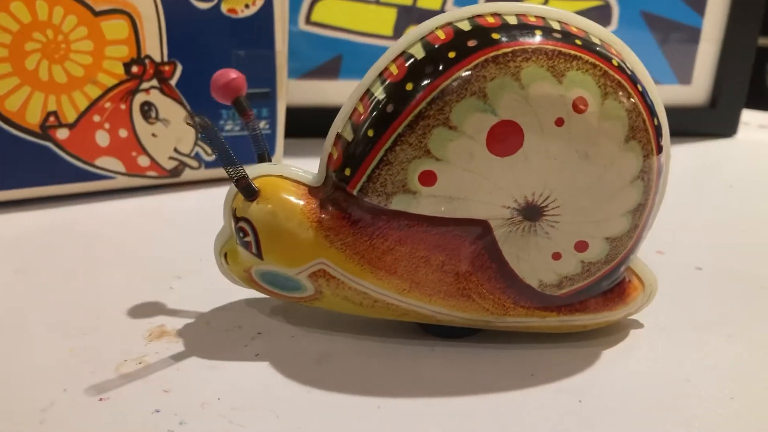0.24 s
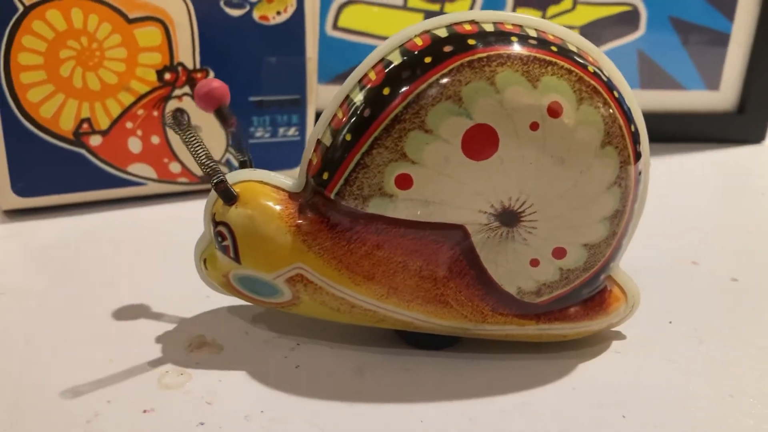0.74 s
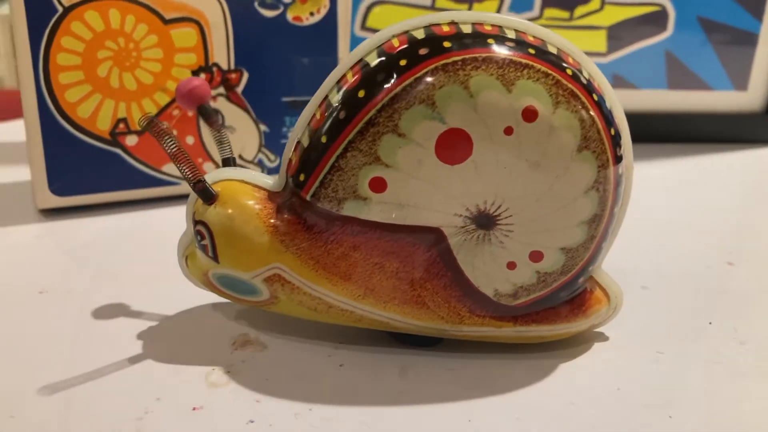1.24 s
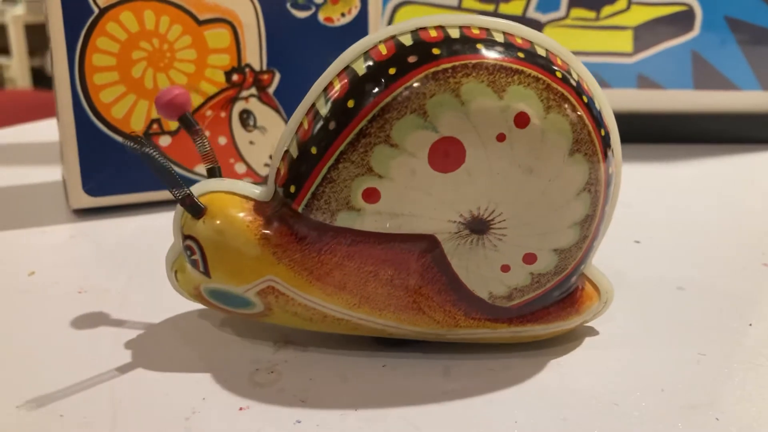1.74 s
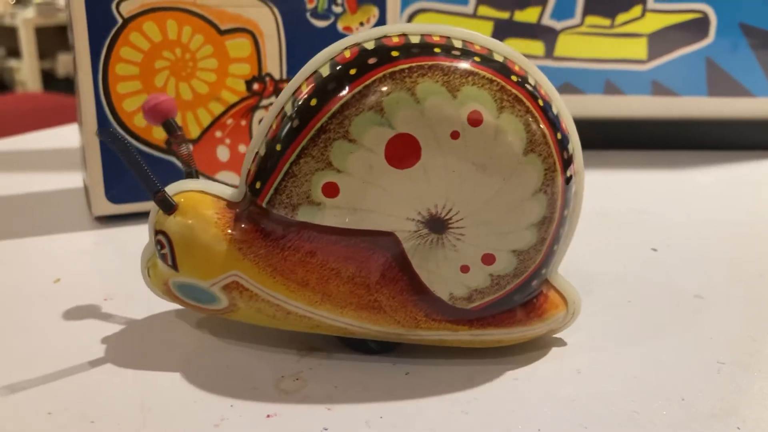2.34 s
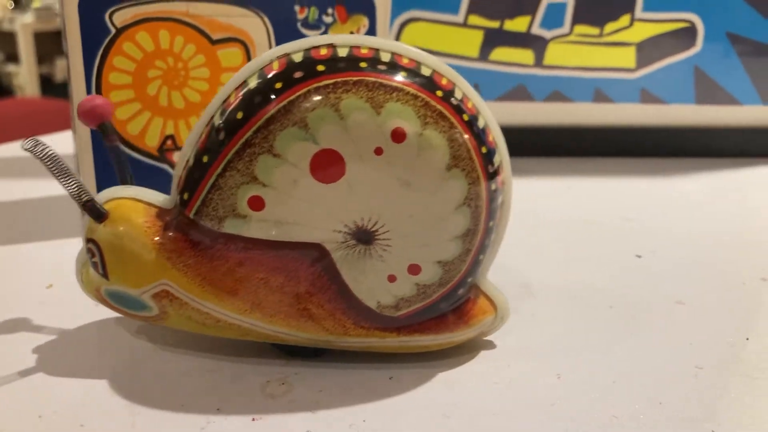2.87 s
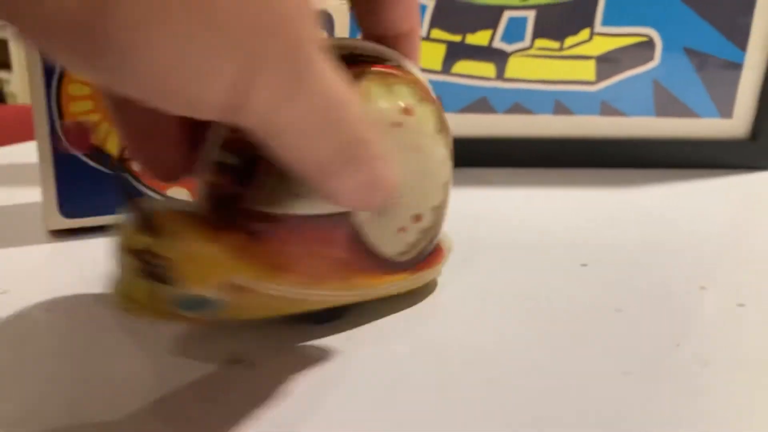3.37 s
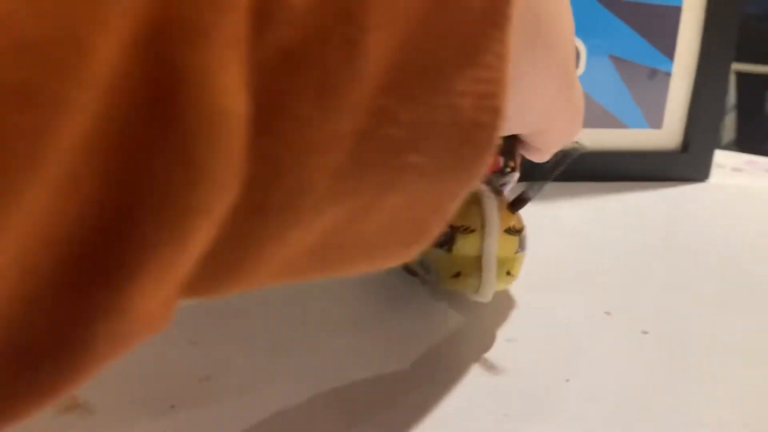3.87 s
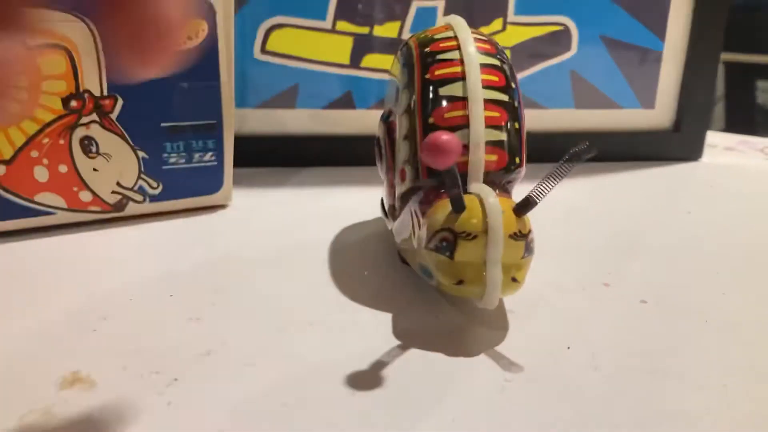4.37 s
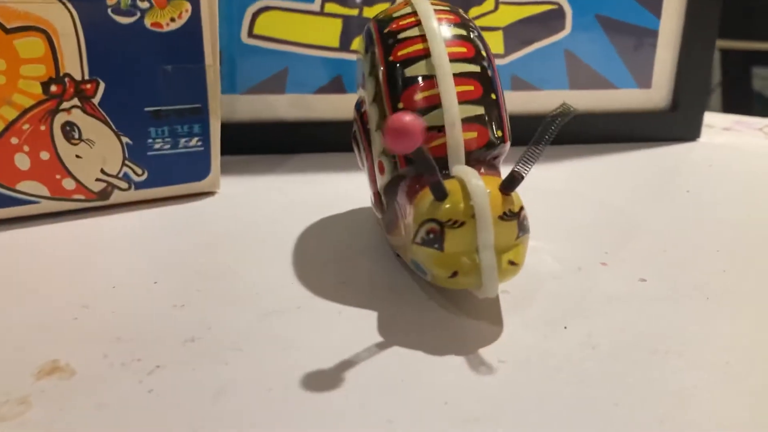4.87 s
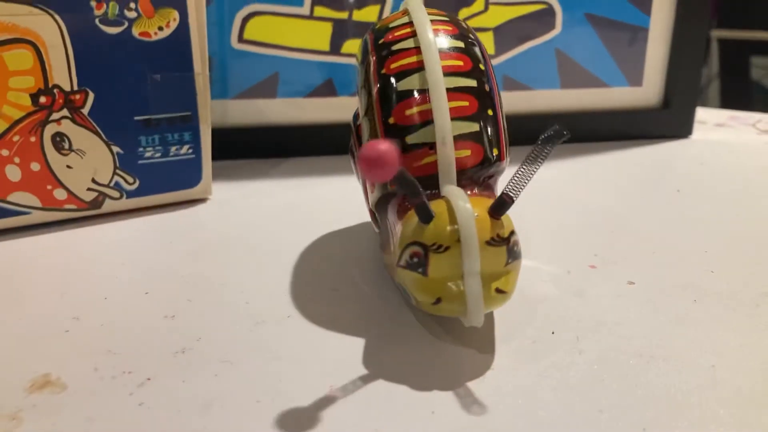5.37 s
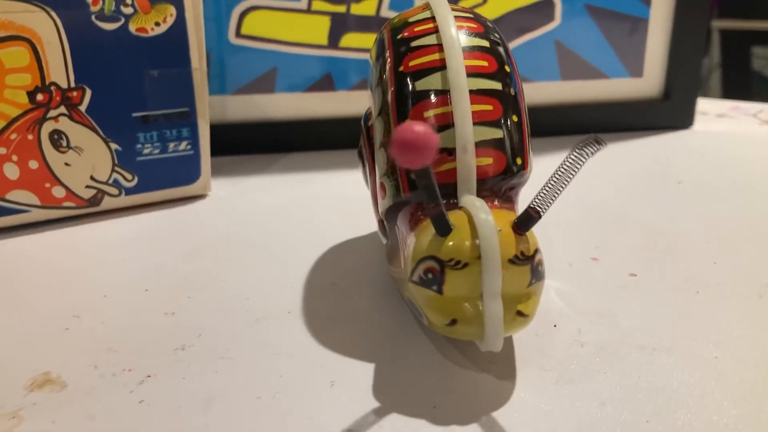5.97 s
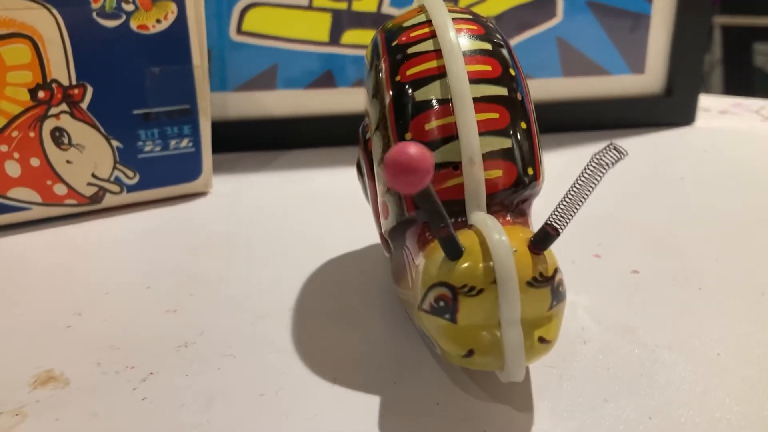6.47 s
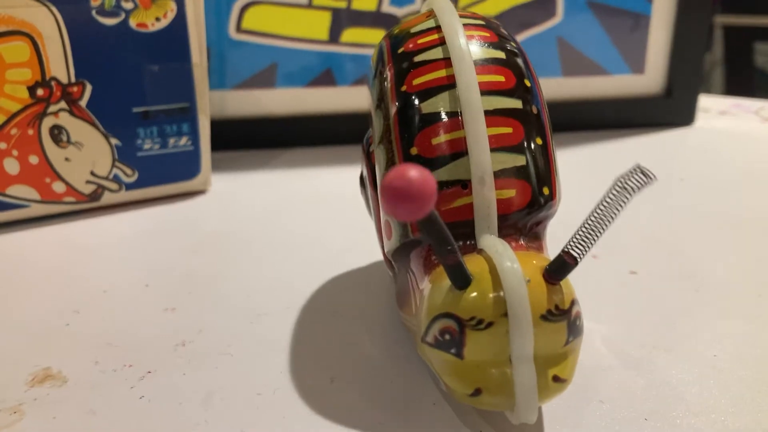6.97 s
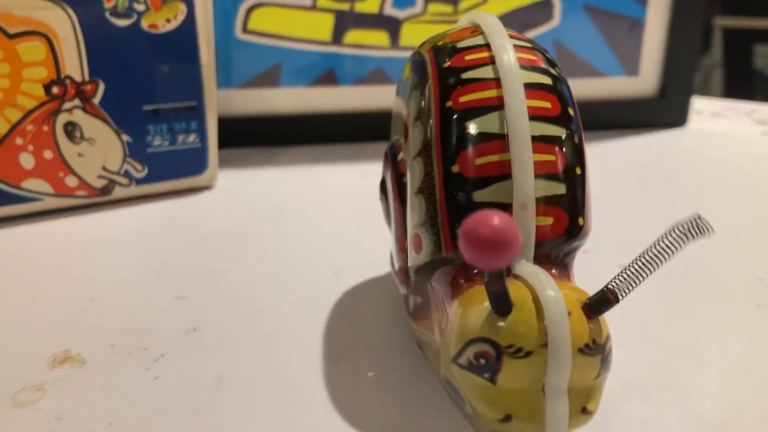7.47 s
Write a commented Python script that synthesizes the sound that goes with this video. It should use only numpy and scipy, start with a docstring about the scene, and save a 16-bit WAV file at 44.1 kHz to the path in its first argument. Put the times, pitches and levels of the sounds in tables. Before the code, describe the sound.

Close, dry stereo sound of a wind-up tin toy on a table in a quiet indoor room. From 0 s a dense, bright metallic rattle runs fast and strong, with hard bursts and hollow knocks over a buzzing governor whirr and low wheel rumble. Around 1.6 s it slows and drops, then swells unevenly from 2.1 s with a tiny hitch near 2.3 s. At 3.2 s a hand closes round the shell; the tone becomes more hollow, and about 3.5 s it booms against the table. After a brief surge near 4.1 s the chatter is weaker and slower until about 5.6 s. It then strengthens, with crowded hard bursts from 6.7 to 7.3 s. Near 7.4 s the mechanism stumbles into small rapid ticks and dies away by 7.7 s, leaving faint hum, soft rumble and hiss.

```python
"""Tin clockwork toy on a table

A wind-up tin toy creeps over a table close to a phone's two microphones, side-on, then turned by hand to face it.
Random tooth blows, throbbing with the spinning governor and a slower wheel, ring the resonances of shell and table:
a dense rattle with harder bursts and knocks. The spring's pull sags and recovers; at the end the train stutters.
The governor whirrs and the wheels rumble in the table. Mains hum, soft room rumble and faint hiss lie below."""
import sys
import numpy as np
from scipy import signal
from scipy.fft import rfft, irfft, next_fast_len
from scipy.io import wavfile
from scipy.ndimage import uniform_filter1d

SR = 44100
rng = np.random.default_rng(int(sys.argv[2]) if len(sys.argv) > 2 else 0)


def magnitude_from_level(level_db):
    """Linear magnitude for a level in decibels (20 dB per decade)."""
    exponent = np.asarray(level_db, float) / 20
    return 10 ** exponent


def pcm_store(signal):
    """Save signal as 16-bit PCM."""
    levels = np.round(np.clip(np.atleast_2d(signal), -1, 1) * 32767)
    wavfile.write(sys.argv[1], SR, levels.astype(np.int16).T)


N = 340452
TIME = np.arange(N) / SR
SIZE = next_fast_len(N + 8192)  # transform length, with space for the ringing
HZ = np.arange(SIZE // 2 + 1) * SR / SIZE


def toy():
    """Tooth blows ring the shell in its changing pose; whirr and table rumble follow the spring's pull."""
    level_db, turns = spring_run()
    pose = toy_pose()
    throb_db = throb(turns)
    steady = chatter(level_db, throb_db)
    hard = hard_bursts(level_db)
    blows = tooth_blows(steady, hard, throb_db, pose)
    under = whirr(turns, pose) + table_roll(throb_db)
    return shell(blows, pose) + magnitude_from_level(level_db) * under


# the spring's pull: t/s, governor turns per s, chatter level/dB before the shell
RUN = [(0, 114, -24.5), (0.351, 104, -26), (1.25, 92, -25.5), (1.62, 66, -33), (1.9, 73, -32),
       (2.131, 77, -26), (2.44, 76, -31.5), (2.6, 86, -26.5), (3.2, 92, -27), (3.6, 86, -32.5),
       (4.13, 115, -28), (4.25, 71, -33.5), (4.6, 61, -36), (5.07, 71, -30), (5.44, 70, -34.5),
       (5.53, 65, -33), (5.811, 88, -26), (6.099, 86, -29), (6.75, 80, -27), (7.27, 67, -28),
       (7.4, 110, -34.5), (7.429, 140, -29), (7.45, 63, -37), (7.571, 63, -42), (7.619, 62, -73),
       (7.72, 51, -53)]


def spring_run():
    """The pull of the spring sets the chatter level and drives the governor; its angle sums up its speed."""
    s, speed, level_db = np.transpose(RUN)
    turns = 2 * np.pi * np.cumsum(np.interp(TIME, s, speed)) / SR
    return np.interp(TIME, s, level_db), turns


def throb(turns):
    """Teeth load and unload with the governor, the eccentric wheel and chance (dB)."""
    wheel_ratio = 4.6  # governor turns for one turn of the wheel before it
    wheels = 1.53 * np.cos(turns) + 0.56 * np.cos(turns / wheel_ratio)
    return wheels + 0.99 * walk(70) + 1.2 * walk(200)


# the train hangs for an instant: t/s, level change/dB
HITCHES = [(2.321, -5), (5.405, -2.5), (6.659, -6), (7.434, -11)]
HITCH_S = 0.0093


def chatter(level_db, throb_db):
    """Strength of the steady tooth blows, throbbing and dropping where the train hangs."""
    hang_db = sum(bell(s, HITCH_S, db) for s, db in HITCHES)
    return magnitude_from_level(level_db + throb_db + hang_db)


# the hardest bursts of tooth blows: t/s, nominal peak level/dB before the shell
BURSTS = [(.016, -7), (.06, -2.5), (.114, -5), (.162, -2), (.275, -5), (.311, -12), (.406, -14), (.498, -7),
          (.546, -3), (.607, -10), (.756, -13), (.805, -4.5), (.893, -11), (.955, -10), (1.236, -10),
          (1.296, -8), (1.32, -3), (1.654, -20), (1.911, -12), (2.042, -9), (2.146, -12), (2.331, -7.5),
          (2.499, -6), (2.554, -9), (2.614, -16), (2.81, -6), (2.953, -6), (3.14, -3.5), (3.391, -17),
          (3.501, -9), (3.7, -11), (3.961, -11), (4.073, -5), (4.238, -14), (4.415, -11), (4.479, -8.5),
          (4.566, -11), (4.902, -13), (5.12, -9), (5.149, -10), (5.21, -9.5), (5.413, -9), (5.57, -13),
          (5.619, -18), (5.686, -14), (5.912, -9), (6.116, -7), (6.162, -7), (6.284, -9), (6.346, -4.5),
          (6.453, -8), (6.503, -15), (6.723, -6), (6.785, -5), (6.866, -6), (6.941, -2.5), (6.999, -5),
          (7.044, -8), (7.1, -6), (7.147, -5), (7.18, -4), (7.253, -6), (7.388, -7.5)]
# single teeth catching as the train stalls: t/s, nominal peak level/dB before the shell, length/s
TICKS = [(7.439, -20.5, 0.01), (7.459, -19, .012), (7.481, -21, .014), (7.503, -17, 0.0094),
         (7.522, -17.5, 0.0084), (7.551, -25, 0.012), (7.576, -17.5, 0.013), (7.603, -17, 0.016),
         (7.637, -17.5, 0.018), (7.667, -23, 0.014), (7.706, -19, 0.01)]


def hard_bursts(level_db):
    """Teeth crowd into listed bursts, lesser chance bursts and the single catches of the stall."""
    hard = bursts(BURSTS, rise_s=0.0076, length_s=0.014)
    hard = hard + bursts(lesser(level_db), rise_s=0.0048, length_s=0.0055)
    return hard + sum(bursts([(s, db)], 0.0026, length_s, square=4.7) for s, db, length_s in TICKS)


def lesser(level_db):
    """Chance bursts, one somewhere in each slot up to the stall, riding on the chatter level."""
    per_s, over_db = 42, 15.5  # nominal peak over the chatter
    slots = np.arange(0, TICKS[0][0] - .2, 1 / per_s)
    place = .5 + .5 * np.tanh(rng.standard_normal(len(slots)))
    s = np.clip(slots + place / per_s, 0, TIME[-1])
    return np.transpose([s, np.interp(s, TIME, level_db) + over_db])


def bursts(rows, rise_s, length_s, square=2):
    """Strength of (s, peak dB) bursts: quick rise, then a fall that is more abrupt the squarer it is."""
    crest_db = 13.5  # nominal peak over the rms
    s, db = np.transpose(rows)
    starts = np.bincount((s * SR).astype(int), magnitude_from_level(db - crest_db), N)
    age = TIME[:SR // 10]
    rise = 1 - np.exp(-(age / rise_s) ** 2)
    fall = np.exp(-(age / length_s) ** square)
    return signal.fftconvolve(starts, rise * fall)[:N]


# tooth blows that reach each group of modes, low to high: blows per s, exponential spread of level/dB
TEETH = [(9040, 1), (6000, 1.16), (6920, 0.4), (5910, 2.5), (8800, -0.8), (12070, 1.5), (11960, 0.46)]
# share of the blows that table, hollow and wall take: level/dB, one row for each pose
LOW_DB = [-11, -11, -10, -8.5, -11]
# the grip squeezes the shell onto the table and it booms: t/s, length/s, extra level of the lowest modes/dB
GRIP = (3.47, 0.15, 5.4)
# the closing hand cups the shell hollow: t/s, length/s, extra level/dB
CUP = (3.2, 0.064, 5)
# in the stall the catches hardly move the lowest modes but ring the hollow: level/dB of lowest, of hollow
STALL_DB = (-5.5, 5.5)
# hard knocks that ring the shell near 1 kHz: t/s, nominal peak level/dB of the ring
KNOCKS = [(0.0353, -28), (0.0907, -30), (0.1263, -18), (0.2059, -35), (0.23, -27), (0.26, -28),
          (0.2826, -27), (0.315, -23), (0.3443, -24), (0.368, -23), (0.4219, -28), (0.4614, -39),
          (0.5035, -31), (0.5528, -27), (0.6649, -32), (0.7672, -26), (0.8165, -23), (0.906, -31),
          (0.9584, -22), (1.0101, -23), (1.038, -29), (1.1458, -26), (1.2327, -24), (1.2979, -23),
          (1.3346, -27), (1.367, -22.5), (1.6518, -28), (1.72, -26.5), (2.0906, -27), (2.1216, -29),
          (2.3395, -30), (2.4977, -29), (2.5389, -40), (2.5684, -23), (2.6085, -30), (2.6993, -29),
          (2.7472, -30), (2.9038, -26), (2.9521, -28), (2.9716, -26), (3.0031, -32), (3.1433, -33),
          (3.1689, -27), (3.5244, -25), (3.8741, -34), (3.943, -37), (3.9684, -27), (4.0008, -32),
          (4.2657, -27), (4.4844, -24.5), (4.5421, -31), (4.9003, -28), (4.9921, -31), (5.1917, -41),
          (5.2121, -26), (5.3888, -35), (5.4205, -35), (5.4849, -35), (5.6542, -33), (5.7033, -33),
          (5.7254, -30), (5.7774, -26), (5.8351, -27), (5.916, -25), (6.0928, -25), (6.1227, -29),
          (6.2886, -24), (6.352, -27), (6.4792, -28), (6.5677, -41), (6.5947, -31), (6.6297, -24),
          (6.6902, -31), (6.8448, -25), (6.9361, -31), (6.9659, -30), (7.0015, -37), (7.1452, -40),
          (7.1901, -34), (7.2642, -24)]


def tooth_blows(steady, hard, throb_db, pose):
    """Each group of modes is struck by its own teeth, so it flickers on its own; knocks hit the shell wall."""
    low_db = np.interp(pose, range(len(LOW_DB)), LOW_DB)
    stalled = np.interp(TIME, [7.25, 7.45], [0, 1])
    table_db = low_db + bell(*GRIP) + STALL_DB[0] * stalled
    hollow_db = low_db + bell(*CUP) + STALL_DB[1] * stalled
    wall_db = low_db + 0.16 * throb_db
    group_db = [table_db, hollow_db, wall_db, 0, 0, 0, 0]
    # the wall answers bursts half a dB less than the others, in the stall half a dB more
    taken = [1, 1, magnitude_from_level(stalled - 0.5), 1, 1, 1, 1]
    pushes = []
    for db, part in zip(group_db, taken):
        flicker_db = 0.97 * walk(55) + 0.6 * walk(12)
        pushes.append(np.hypot(steady, part * hard) * magnitude_from_level(flicker_db + db))
    # one set is shared by the microphones, the other serves for what they do not share
    blows = np.array([[push * clicks(*teeth) for push, teeth in zip(pushes, TEETH)] for _ in range(2)])
    s, db = np.transpose(KNOCKS)
    knock_db = 15.5  # strength of the blow over the peak that it rings up to
    blows[:, 2] += np.bincount((s * SR).astype(int), magnitude_from_level(db + knock_db), N)
    return blows


def clicks(rate, spread_db):
    """Scattered one-sample blows of random size and sign, rms 1."""
    size = magnitude_from_level(spread_db * rng.exponential(size=N)) * rng.standard_normal(N)
    return unit(size * (rng.random(N) < rate / SR))


# the toy is turned by hand and comes near: t/s, pose 0-4 in the order of the level columns of SHELL
POSE = [(1.4, 0), (1.9, 1), (3.2, 1), (3.6, 2), (4.22, 2), (4.34, 3), (5.45, 3), (5.85, 4)]


def toy_pose():
    """The pose glides from side-on to facing and near."""
    return np.interp(TIME, *np.transpose(POSE))


# resonances of shell and table: f/Hz, width/Hz, then relative level/dB side-on, side-on further left,
# gripped, facing, facing and near
SHELL = [(390, 145, -9, -3, 0, -0.5, -0.5), (460, 29.8, 2, -2, 7, 8, 9), (657, 42, -1.5, -1, -3, -16, 0),
         (844, 114, -0.5, 1, -3.5, -17, 1.5), (1030, 70, 4, 6.5, 2, 3.5, 9.5),
         (1158, 89, 7, 4.5, 8.5, 8, 5.5), (1394, 51, -27, -2, 2.5, 2.5, -3),
         (1508, 98, 2.5, 1, 1.5, -5, -4.5), (2053, 270, -7, -8, -11, -10.5, -7),
         (2349, 103, -7.5, -5, 4.5, -7.5, 0), (2583, 190, -11, -38, -0.5, -9.5, 0),
         (2960, 175, 2.5, 3, -2, -3.5, -5), (3453, 120, 4.5, 1, -5, -1, -5),
         (3850, 380, 0, -2.5, -7.5, -4.5, -4.5), (4510, 294, -3, 1.5, -3, -3, -2.5),
         (4844, 160, 0.5, 3.5, 2.5, 2, 3), (5310, 170, 7, 2, 2, 0.5, 3.5),
         (5780, 630, -0.5, -0.5, -5.5, -2, -2.5), (6415, 310, 1.5, -16, 2, 0, 3.5),
         (7250, 190, 5, 4, 0.5, -2.5, -30), (7470, 1130, 3, 2.5, -4, -5, -1),
         (8220, 290, 0, -9.5, 6.5, 6.5, 6.5), (9100, 650, 4, 3.5, 1.5, 1.5, 1.5),
         (9760, 240, 5.5, 5, 2, 10, 9), (10100, 380, 6, 2.5, 5, 0.5, 4),
         (10950, 760, 3.5, 4.5, 0.5, 1.5, -0.5), (11430, 350, 2.5, -22.0, 3, 3, 2),
         (12400, 970, 2.5, 2, -0.5, 0, -0.5), (14050, 920, 0, -3.5, -6, -10, -4),
         (15140, 500, -4, -5, -7, -9.5, -6.5)]
# edges of the groups of modes, the lowest three being table, shell hollow and shell wall: f/Hz
PANELS_HZ = (0, 560, 950, 1800, 2800, 4200, 7800, 20000)


def shell(blows, pose):
    """The blows ring the modes: the pose fades between sets, a random drift between two drawn ripples of each."""
    modes = np.array(SHELL)
    panel = np.digitize(modes[:, 0], PANELS_HZ) - 1
    # the drift keeps the ripple from leaving steady lines
    drift = np.pi / 4 * (1 + np.tanh(1.4 * walk(5)))
    out = 0
    for view in range(modes.shape[1] - 2):
        for fade in (np.sin, np.cos):
            share = np.sqrt(np.clip(1 - abs(pose - view), 0, 1)) * fade(drift) ** 2
            bodies = np.array([ringing(modes[panel == k][:, [0, 1, 2 + view]]) for k in range(panel.max() + 1)])
            power = np.mean(abs(bodies) ** 2, axis=1)
            bodies[:3] /= np.sqrt(power[:3].sum())
            bodies[3:] /= np.sqrt(power[3:].sum())
            same, other = (rfft(share * blows, SIZE) * bodies).sum(axis=1)
            out = out + to_ports(same, other, turned=int(view >= 2))
    return out


def ringing(modes):
    """Causal response: the sum of steep (Hz, width, dB) resonances, with a random ripple in the treble."""
    count = 4096
    ripple_db, ripple_hz = 2, 70
    hz = np.arange(count + 1) * SR / (2 * count)
    centre, width, db = np.transpose(modes)
    detune = 1.29 * (hz[:, None] - centre) / width
    power = (magnitude_from_level(db) ** 2 / (1 + detune ** 2) ** 2).sum(axis=1)
    knots = rng.standard_normal(count + 1)
    ripple = np.interp(hz / ripple_hz, np.arange(count + 1), knots) * np.clip(hz / 4500, 0, 1) ** 2
    # folding the cepstrum gives minimum phase
    cepstrum = irfft(np.log(np.sqrt(power) * magnitude_from_level(ripple_db * ripple)))
    cepstrum[1:count] *= 2
    cepstrum[count + 1:] = 0
    return rfft(irfft(np.exp(rfft(cepstrum))), SIZE)


# left against right: f/Hz, left over right level/dB, right leads/half cycles side-on, when turned,
# likeness (0-1) side-on, when turned; above 6.5 kHz the lead is then flattened near whole half cycles
PORTS = [(60, -1.3, 0, 0, .98, .98), (300, .5, -.13, -.13, .95, .95), (1300, 2, -.22, -.22, .93, .88),
         (1800, 3, -1, -1, .7, .7), (2250, 7, -2, -1.1, .3, .3), (2550, 1, -3, -1.7, .6, .8),
         (3000, 1, -2.6, -2.3, .6, .7), (3350, 1, -2.9, -2.72, .6, .85), (3750, .8, -3.1, -3.02, .5, .93),
         (4100, .5, -3.8, -3.4, .45, .5), (5400, -3, -3.5, -3.5, .45, .7), (6500, 0, -3.9, -3.9, .3, .97),
         (7000, 0, -4, -4, .93, 1), (9080, 0, -3, -3, 1, 1), (11350, 0, -2, -2, 1, 1),
         (13550, 0, -1, -1, 1, 1), (15650, 0, 0, 0, 1, 1)]


def to_ports(same, other, turned):
    """Left and right channels from a shared spectrum, shifted in phase, and an unshared one."""
    hz, tilt_db, *rest = np.transpose(PORTS)
    lead = np.pi * np.interp(HZ, hz, rest[turned])
    # above 6.5 kHz the lead is flattened near whole half cycles
    lead -= (.46, .36)[turned] * np.sin(2 * lead) * (HZ > 6500)
    like = np.interp(HZ, hz, rest[2 + turned])
    tilt = magnitude_from_level(np.interp(HZ, hz, tilt_db) / 2)
    right = like * same * np.exp(1j * lead) + np.sqrt(1 - like ** 2) * other
    return irfft(np.array([same * tilt, right / tilt]), SIZE)[:, :N]


# governor imbalance: multiple of its turns, mean peak level/dB over the chatter in pose 0
WHIRR = [(1, -33), (2, -34), (3, -38.5)]


def whirr(turns, pose):
    """The unbalanced governor hums at multiples of its speed, stronger as the pose goes on."""
    tones = sum(magnitude_from_level(db + 4.2 * walk(9)) * np.cos(k * turns) for k, db in WHIRR)
    return tones * (1 + 0.46 * pose)


# wheels rumbling in the table: f/Hz, relative level/dB per Hz
ROLL = [(40, -17), (80, 0.5), (160, 6.5), (300, -2.5), (420, -8), (800, -52)]


def table_roll(throb_db):
    """Wheels rumble in the table: low noise 25 dB under the chatter, throbbing at half its depth."""
    return magnitude_from_level(-25 + 0.5 * throb_db) * coloured(ROLL)


# mains: f/Hz, rms level/dB before its wander and the tilt to the right
HUM = [(60, -67), (120, -47.5)]
# air of the room: f/Hz, relative level/dB per Hz
ROOM = [(20, -35), (40, 1.5), (80, 5.5), (200, 5), (400, -5.5), (750, 0), (1300, -6.5), (2100, -25),
        (4000, -21), (16000, -68)]


def room():
    """Wandering mains hum over noise of soft rumble and faint hiss, a little stronger on the right."""
    hum = sum(np.sqrt(2) * magnitude_from_level(db + 2.4 * walk(2.96)) * np.cos(2 * np.pi * hz * TIME) for hz, db in HUM)
    opposed = coloured(ROOM) * np.array([[1], [-1]])
    air = magnitude_from_level(-48.5) * (coloured(ROOM) + magnitude_from_level(-8.5) * opposed)
    return (hum + air) * magnitude_from_level(np.array([[-.6], [.6]]))


def unit(x):
    """Scale to rms 1."""
    return x / np.sqrt(np.mean(x ** 2))


def walk(rate):
    """Random levels held 1 / rate s and slewed twice; rms 1."""
    k = int(SR / rate)
    held = np.repeat(rng.standard_normal(N // k + 1), k)
    return unit(uniform_filter1d(uniform_filter1d(held, k), k)[:N])


def coloured(points):
    """Noise with a spectrum of (Hz, dB) points, rms 1."""
    hz, db = np.transpose(points)
    gain = magnitude_from_level(np.interp(np.log(HZ + 1), np.log(hz), db))
    return unit(irfft(rfft(rng.standard_normal(N), SIZE) * gain, SIZE)[:N])


def bell(s, length_s, db):
    """A smooth rise and fall in dB."""
    return db * np.exp(-((TIME - s) / length_s) ** 2)


def scene():
    """The toy on the table, close up, and the room behind it."""
    return toy() + room()


def top_cut(x):
    """Nothing passes above the cut-off."""
    return signal.sosfilt(signal.butter(12, 17100, fs=SR, output="sos"), x)


def record(dry):
    """The phone hears no extreme top: a steep low-pass cuts it at 15720 Hz."""
    top = signal.ellip(12, .3, 90, 15720, fs=SR, output="sos")
    mix = signal.sosfilt(top, dry)
    return top_cut(mix)


dry = scene()
out = record(dry)
pcm_store(out)
```